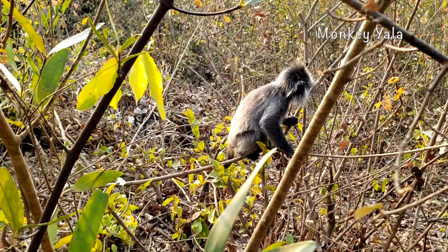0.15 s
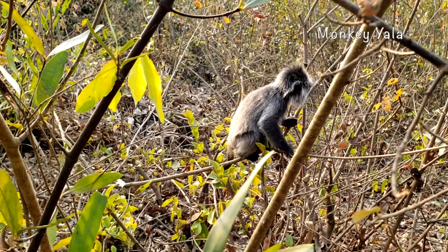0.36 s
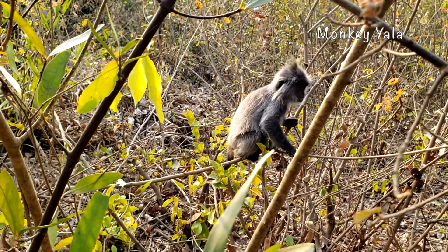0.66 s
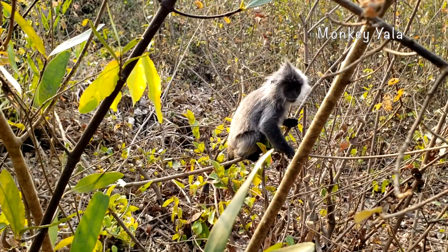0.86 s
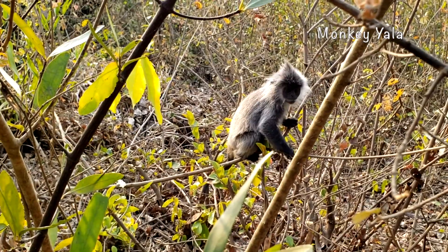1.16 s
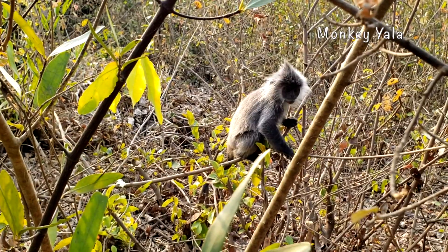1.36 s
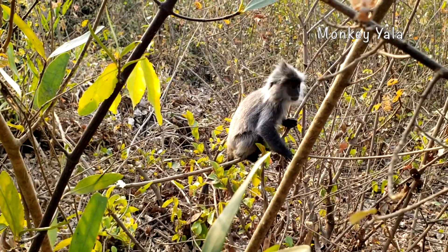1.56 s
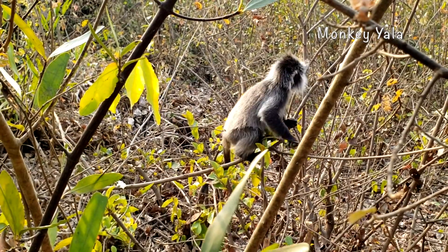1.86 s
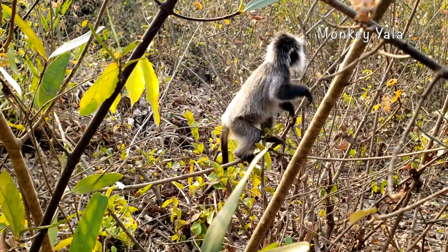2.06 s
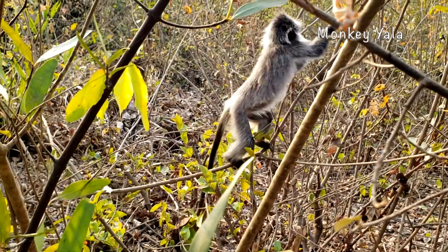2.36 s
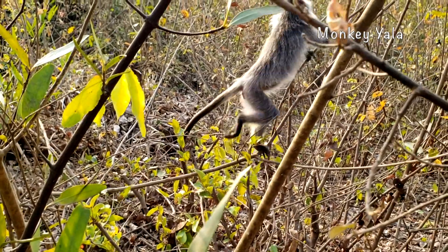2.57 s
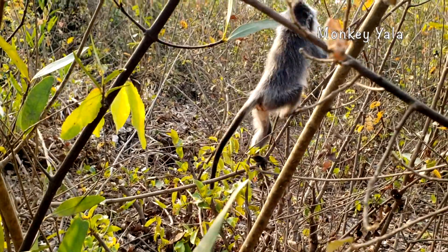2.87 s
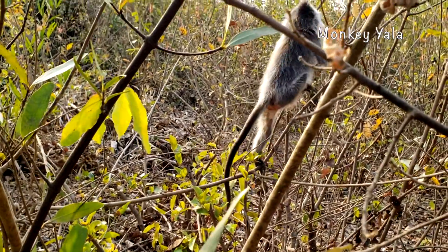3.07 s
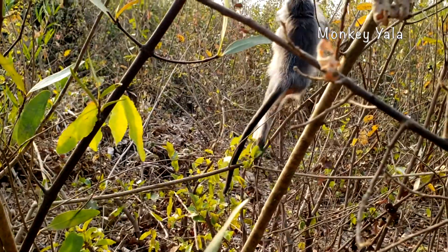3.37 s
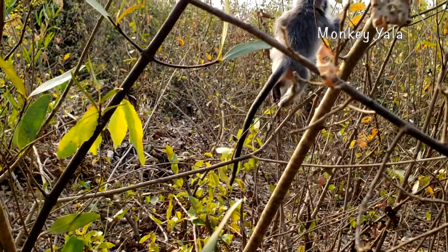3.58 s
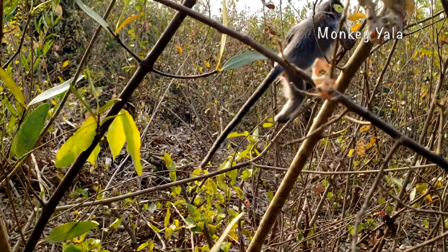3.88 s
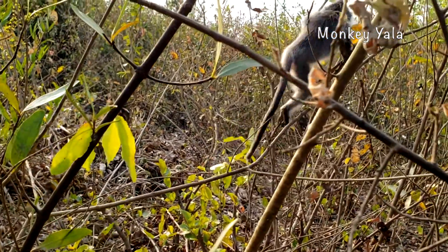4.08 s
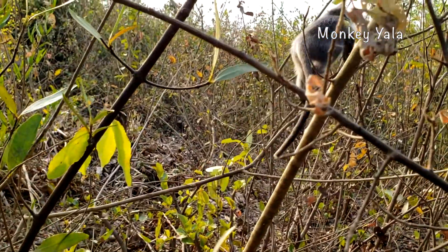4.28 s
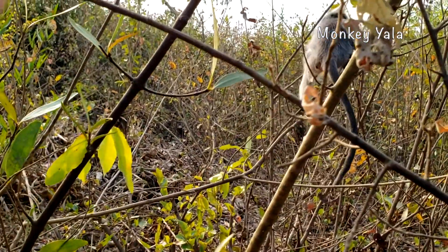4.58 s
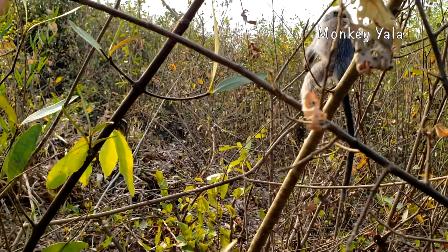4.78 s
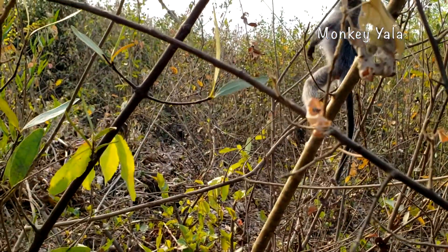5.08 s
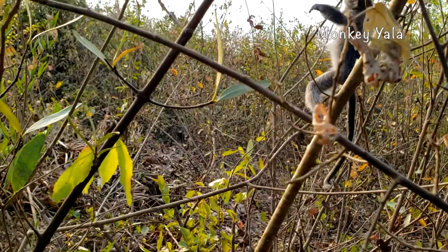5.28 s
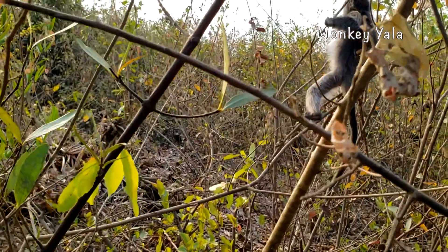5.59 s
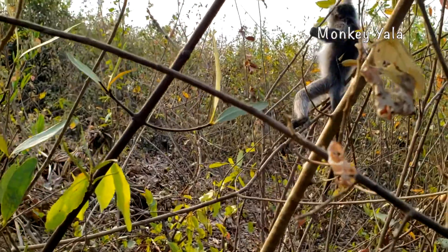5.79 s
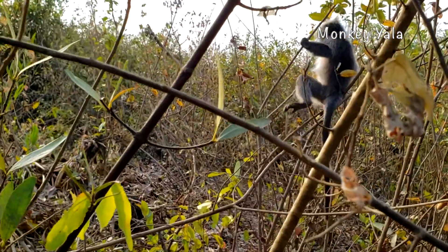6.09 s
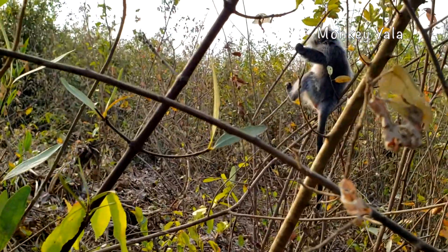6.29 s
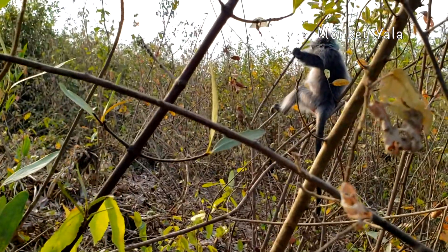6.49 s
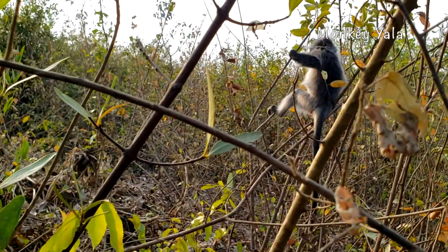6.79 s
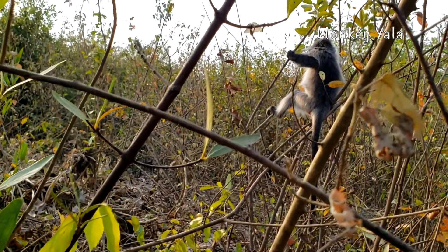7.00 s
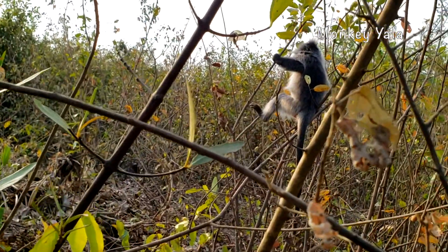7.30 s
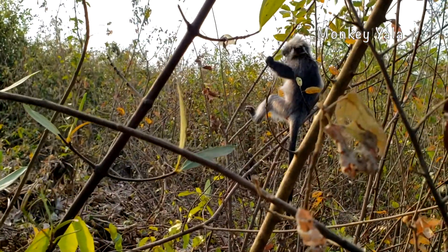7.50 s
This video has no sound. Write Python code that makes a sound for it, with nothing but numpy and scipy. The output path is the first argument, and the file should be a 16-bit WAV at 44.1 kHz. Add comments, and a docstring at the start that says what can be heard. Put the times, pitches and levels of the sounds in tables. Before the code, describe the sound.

Small birds sing quick, high, slurred whistles close by and slightly left in dry scrub for the first 1.3 seconds, with rapid chirps further left and faint caws. A short raspy bird scold comes near 1.9 seconds. From about 2 seconds a monkey climbs through the brush: dead leaves rustle and crackle in uneven pushes and twigs snap, loudest from 3.5 to 4.2 seconds, thinning out by 6. A bird on the left pipes even pips from 2.5 to 4.3 seconds. The close song returns just after 5 seconds with wavy whistles, then from 6.2 repeats a quick rising phrase until the end at about 7.5, with distant birds joining. One more twig snaps near 7.4. A low outdoor rumble and soft hiss lie underneath, and puffs of wind thump the microphone's right side around 3.3 and 5.7 seconds.

```python
"""Small birds sing quick slurred whistles in dry scrub, close by and a little left of the microphone.
They give two bouts of song; others call further off, blurred by scatter from stems and leaves.
Between the bouts a monkey climbs through the brush: dead leaves crackle and twigs snap.
A low outdoor rumble lies underneath, and a few puffs of air buffet the right microphone port."""
import sys
import numpy as np
from scipy import signal
from scipy.fft import rfft, irfft
from scipy.io import wavfile
from scipy.ndimage import uniform_filter1d, map_coordinates

SR = 44100
rng = np.random.default_rng(int(sys.argv[2]) if len(sys.argv) > 2 else 0)


def int16_out(signal):
    """Quantize to a 16-bit WAV file."""
    q = np.round(np.clip(np.atleast_2d(signal).T, -1, 1) * 32767)
    wavfile.write(sys.argv[1], SR, q.astype(np.int16))


N = 337365
T = np.arange(N) / SR
TOP_HZ = 16000  # upper limit of the recorder
STIR_FROM_S = 1.92  # the monkey starts to move


def undb(db):
    """Decibels to gain."""
    return 10 ** (np.asarray(db) / 20)


def unit(x):
    """Scale to rms 1."""
    return x / np.sqrt(np.mean(x ** 2))


def add(track, s, x):
    """Mix x into the track from time s on."""
    i = max(int(s * SR), 0)
    track[..., i:i + x.shape[-1]] += x[..., :max(N - i, 0)]


def colour(x, points):
    """Causal filter of unit energy, shaped by (frequency_hz, gain_db) points."""
    hz, db = np.transpose(points)
    f = np.maximum(np.arange(N + 1) * SR / (2 * N), 1)
    cepstrum = irfft(np.log(undb(np.interp(np.log(f), np.log(hz), db))))
    cepstrum[1:N] *= 2  # fold to minimum phase
    cepstrum[N:] = 0
    response = irfft(np.exp(rfft(cepstrum)))[:SR // 4]
    return signal.fftconvolve(x, response[None] / np.linalg.norm(response))[:, :N]


def band_noise(order, band_hz):
    """Band-passed noise, different at each port."""
    bandpass = signal.butter(order, band_hz, "band", fs=SR, output="sos")
    return signal.sosfilt(bandpass, rng.standard_normal((2, N)))


def walk(rate_hz):
    """A random wander with a spread near 1."""
    knots = rng.standard_normal(int(N / SR * rate_hz) + 2)
    return np.interp(T * rate_hz, np.arange(len(knots)), knots)


def swells(rows, rise_db_per_s, fall_db_per_s):
    """Gain that rises to, holds and falls from each (full_s, held_s, level_db) row."""
    levels_db = [db - rise_db_per_s * np.maximum(s - T, 0) - fall_db_per_s * np.maximum(T - s - held, 0)
                 for s, held, db in rows]
    return undb(np.max(levels_db, axis=0))


def place(x, pan_db, lead_s):
    """A source at the two ports: positive values make it louder and earlier on the left."""
    delayed = map_coordinates(x, [(T - lead_s) * SR], order=3)
    return np.array([undb(pan_db / 2) * x, undb(-pan_db / 2) * delayed])


def scrub(x, t60_s, build_s):
    """Stems and leaves scatter a sound into a short diffuse tail, different at each port."""
    t = T[:SR]
    tail = rng.standard_normal((2, SR)) * undb(-60 * t / t60_s) * (1 - np.exp(-t / build_s))
    tail /= np.linalg.norm(tail, axis=1, keepdims=True)
    return signal.fftconvolve(x[None], tail)[:, :N]


def syrinx(notes, unsteady=0.0099, shimmer_db=0.1, third_db=-27, waver_rad=0.78, edge_db=-15.5):
    """A bird's voice: nearly pure whistles that glide, flutter and never come out quite the same."""
    # note shapes, by name: attack_share, release_share, glide points (length_share, pitch_ratio)
    shapes = { "arch": (0.24, 0.33, [(0, 0.83), (.3, 0.95), (.72, 0.98), (1, 0.76)]),
              "hump": (0.34, 0.24, [(0, .83), (.36, 0.98), (.72, .94), (1, 0.81)]),
              "rise": (0.53, 0.24, [(0, .85), (1, 1.08)]), "lift": (0.54, 0.046, [(0, 0.82), (.68, 0.97),
              (1, .8)]), "climb": (0.67, 0.16, [(0, .68), (.18, .69), (.64, 0.98), (.85, 0.96), (1, 0.76)]),
              "drop": (0.31, 0.62, [(0, 1.3), (.5, 0.92), (1, 0.63)]), "swoop": (0.36, 0.16, [(0, 1.3),
              (.42, 1.025), (1, .96)]), "tew": (0.79, 0.64, [(0, 1.55), (.35, 1.2), (.55, .97), (.76, .8),
              (.86, 1.2), (1, 0.96)]), "wave": (0.13, 0.092, [(0, 0.94), (.14, 1), (.26, 0.96), (.43, .85),
              (.6, .825), (.8, .89), (.93, .85), (1, 0.72)]), "slide": (0.42, 0.11, [(0, 0.88), (.35, 1.11),
              (.55, 1.04), (.94, 0.85), (1, 0.68)]), "burr": (0.26, 0.27, [(0, 0.93), (.56, 1.004),
              (1, 0.67)]), "trill": (0.057, 0.15, [(0, 0.86), (.45, 0.95), (1, .92)]),
              "quiver": (0.17, 0.086, [(0, 1.016), (1, .93)]), "pip": (0.66, 0.14, [(0, .975), (1, 1.023)]),
              "level": (0.053, 0.24, [(0, 1.003), (1, .997)]), "sag": (0.44, 0.11, [(0, 0.97), (.45, 0.93),
              (1, .86)]), "peak": (0.29, 0.22, [(0, 0.47), (.5, 1.05), (1, .62)]),
              "rasp": (0.14, 0.96, [(0, 1.22), (.09, .92), (.2, 1), (.4, .82), (1, 0.62)]), }
    # fast warble within a note, by shape: from_share, to_share, rate_hz, depth_share (of the pitch)
    flutter = { "slide": (0, .45, 68, -.23), "quiver": (0, .95, 55, .04), "trill": (0, 1, 75, .13),
               "burr": (.1, .75, 115, .09), "tew": (0, .4, 150, .15), "rasp": (.1, 1, 170, .15), }
    out, drift, shimmer, stumble = np.zeros(N), walk(350), walk(250), walk(90)
    for s, shape, length, hz, db in notes:
        u = np.linspace(0, 1, int(length * SR))  # share of the note gone by
        now = (int(s * SR) + np.arange(len(u))) % N
        attack, release, glide = shapes[shape]
        contour = np.interp(u, *np.transpose(glide))
        pitch = hz * uniform_filter1d(contour, size=len(u) // 8, mode="nearest")
        if shape in flutter:
            start, end, rate, depth = flutter[shape]
            window = np.sqrt(np.abs(np.sin(np.pi * np.clip((u - start) / (end - start), 0, 1))))
            warble = np.sin(2 * np.pi * rate * length * u + waver_rad * stumble[now])
            pitch *= 1 + depth * window * warble
        phase = 2 * np.pi * np.cumsum(pitch * (1 + unsteady * drift[now])) / SR
        swell = np.minimum(np.minimum(u / attack, (1 - u) / release), 1) ** 0.86
        # only the lower notes, at full voice, carry an audible third harmonic
        third = undb(third_db) * swell ** 2 * np.clip((4800 - pitch) / 500, 0, 1)
        tone = np.sin(phase) + third * np.sin(3 * phase)
        edges = np.minimum(np.minimum(u, 1 - u) * length / .002, 1)
        gain = undb(db + edge_db * (1 - swell) + shimmer_db * shimmer[now])
        add(out, s, np.sqrt(2) * tone * edges * gain)
    return out


def open_air(rumble_db=-62, left_db=-4, right_db=3, rise_db=3.5, hiss_db=-69):
    """Low rumble that slowly grows, heavier at the right port, and the soft hiss of the open scrub."""
    # spectrum of the rumble: frequency_hz, gain_db
    rumble_spectrum = [(22, -16), (45, -1.5), (62, 0.5), (110, -5), (200, -15), (290, -18), (480, -32.5),
                       (1000, -35), (3000, -53.5)]
    # spectrum of the hiss: frequency_hz, gain_db
    hiss_spectrum = [(600, -7), (2000, -7), (3800, -2.5), (5500, -0.5), (8000, -26.5), (11500, -11),
                     (16000, -6)]
    rumble = unit(colour(rng.standard_normal(N) + 0.57 * rng.standard_normal((2, N)), rumble_spectrum))
    drift_db = 2.06 * walk(8.9) + rise_db * (T / T[-1] - 0.22)
    rumble *= undb(rumble_db + drift_db) * undb([[left_db], [right_db]])
    hiss = unit(colour(rng.standard_normal((2, N)), hiss_spectrum))
    return rumble + hiss * undb(hiss_db + walk(2.854))


def buffets(band_hz=(37, 68), left_db=-16):
    """Eddies thump the right port and barely touch the left."""
    # puffs of air on the microphone: start_s, length_s, level_db
    puffs = [(3.245, 0.081, -35.5), (3.315, 0.16, -41.5), (3.544, 0.23, -47.5), (5.714, 0.08, -30),
             (5.761, 0.25, -42)]
    envelope = np.zeros(N)
    eddies = unit(band_noise(3, band_hz))
    for s, length, db in puffs:
        add(envelope, s, undb(db) * np.hanning(int(length * SR)))
    return envelope * eddies * undb([[left_db], [0]])


def flock(count=260, low_hz=2900, high_hz=5700, direct_db=-7, fade_db_per_s=11, rest_db=-84):
    """Many small slurs from beyond the bushes, half blurred into a chorus that swells and fades."""
    # the flock joins each bout of song: full_voice_s, held_s, level_db
    bouts = [(.35, 0.71, -61.5), (6.3, 0.74, -61)]
    kinds = ("drop", "arch", "tew")
    notes = []
    for k, (when, pitch, far) in enumerate(rng.random((count, 3))):
        s = (k + when) / count * N / SR
        notes.append((s, kinds[k % 3], .05, low_hz + pitch * (high_hz - low_hz), -6 * far))
    voices = syrinx(notes)
    blurred = undb(direct_db) * voices + scrub(voices, t60_s=0.22, build_s=0.0021)
    chorus = unit(colour(blurred, [(6300, -5.5), (7400, -19.5)]))
    return chorus * np.maximum(swells(bouts, fade_db_per_s, fade_db_per_s), undb(rest_db))


def hooting_bird():
    """Low hoots from far off on the right, blurred by the distance."""
    # hoots: start_s, shape, length_s, pitch_hz, level_db
    hoots = [(2.72, "hump", 0.083, 1360, -75.5), (5.22, "level", 0.07, 890, -80.5),
             (5.46, "level", 0.21, 1166, -74)]
    voice = syrinx(hoots, shimmer_db=5.0)
    return undb([[-9], [1.5]]) * (voice + scrub(voice, t60_s=0.33, build_s=0.0043))


def hoarse_bird(length_s=0.13, hz=1850, buzz_hz=150, buzz_rad=0.83):
    """A distant caw: an arched tone roughened into sidebands by a fast buzz."""
    # caws: start_s, level_db
    caws = [(-.02, -69), (.255, -69), (0.511, -72.5), (.79, -69), (1.062, -74), (1.33, -74), (1.615, -66)]
    out, t = np.zeros(N), T[:int(length_s * SR)]
    arch = np.sin(np.pi * t / length_s)
    phase = 2 * np.pi * np.cumsum(hz * (1 - 0.17 * (1 - arch))) / SR
    caw = arch * np.sin(phase + buzz_rad * np.sin(2 * np.pi * buzz_hz * t))
    for s, db in caws:
        add(out, s, undb(db) * caw)
    return out + scrub(out, t60_s=0.23, build_s=0.0024)


def far_birds():
    """Birds deeper in the scrub, to the left: much of each note arrives as scatter from the bushes."""
    # runs of one repeated note: first_s, until_s, period_s, shape, length_s, pitch_hz, level_db
    series = [ (0.335, 1.28, .1245, "tew", .07, 3946, -49.5),
              (1.322, 1.85, 0.0665, "drop", 0.034, 2938, -63), (6.112, 7.18, .126, "tew", 0.07, 3740, -53),
              (7.238, 7.48, 0.064, "drop", 0.032, 2887, -62), ]
    # single calls: start_s, shape, length_s, pitch_hz, level_db
    single_calls = [ (.04, "arch", 0.29, 1596, -77), (1.42, "sag", 0.23, 5150, -65.5),
                    (1.72, "drop", 0.054, 5460, -73), (2.21, "peak", 0.03, 5310, -59),
                    (2.305, "drop", 0.07, 5100, -73.5), (2.378, "rise", 0.055, 3500, -72),
                    (2.465, "rise", 0.044, 3620, -67), (3.78, "level", 0.26, 5820, -67),
                    (4.36, "level", 0.41, 3445, -70), (4.74, "pip", 0.25, 3520, -73),
                    (4.91, "level", 0.425, 5500, -71.5), (6.088, "hump", 0.023, 2104, -58.5), ]
    # a scold, two sharp chips and a falling rasp: start_s, shape, length_s, pitch_hz, level_db
    scold = [(1.885, "peak", 0.017, 6650, -57.5), (1.902, "peak", 0.021, 8400, -64),
             (1.918, "rasp", 0.16, 4330, -53.5)]
    notes = [(s, shape, length, hz, db + rng.standard_normal())
             for first, until, period, shape, length, hz, db in series
             for s in np.arange(first, until, period)]
    repeats = syrinx(notes, unsteady=0.016, shimmer_db=5.5, third_db=-54)
    calls = syrinx(single_calls, unsteady=0.011, shimmer_db=4.5)
    calls += syrinx(scold, unsteady=0.046, shimmer_db=3.0, third_db=-45)
    return (place(undb(-6.5) * repeats, pan_db=21.5, lead_s=.00002)
            + undb(0.5) * scrub(repeats, t60_s=0.9, build_s=0.0017)
            + place(undb(-3.5) * calls, pan_db=4.5, lead_s=.00002)
            + undb(-2) * scrub(calls, t60_s=0.29, build_s=0.0023))


def piping_bird(first_s=2.468, until_s=4.3, period_s=.1608, length_s=0.0482,
                hz=3520, flat_hz=400, warm_s=0.27, peak_db=-55, peak_s=3.5, fade_db_per_s=18):
    """On the left, a run of even pips starts flat, climbs to its pitch, swells and dies away."""
    notes = []
    for s in np.arange(first_s, until_s, period_s):
        pitch_hz = hz - flat_hz * np.exp((first_s - s) / warm_s)
        notes.append((s, "pip", length_s, pitch_hz, peak_db - fade_db_per_s * abs(s - peak_s)))
    pips = syrinx(notes, unsteady=0.0059, shimmer_db=2.5)
    return place(pips, pan_db=10.0, lead_s=0) + undb(-14) * scrub(pips, t60_s=0.13, build_s=.003)


def pushing(uneven_db=1.2, stir_db=-72):
    """Force on the leaves: each push builds, holds unevenly and settles, over a slight steady stir."""
    # the monkey's pushes through the brush: full_force_s, held_s, level_db
    pushes = [(2.07, 0.1, -62.5), (2.56, 0.19, -61.5), (2.82, 0.058, -64.5), (3.21, .11, -63),
              (3.459, 0.36, -50), (3.96, 0.24, -58), (4.3, 0.2, -65), (4.68, 0.26, -67), (5.44, 0.43, -60)]
    stirring = undb(stir_db) * np.clip((T - STIR_FROM_S) * 10, 0, 1)
    force = swells(pushes, rise_db_per_s=93, fall_db_per_s=98) * undb(uneven_db * walk(30))
    return np.maximum(force, stirring)


def leaves(grains_per_s=220, grain_s=0.004, hiss_db=-9, crush_db=-52, touch_db=-69, colour_db=3.5):
    """Dead leaves slide with a hiss; a firmer touch adds fractures, which merge as the push grows."""
    # spectrum of the rustle: frequency_hz, gain_db
    leaf_spectrum = [(350, -64), (600, -23.5), (2090, -23.5), (3430, -11), (4710, -1), (7310, -7),
                     (11300, -1), (14900, 0), (16000, -5.5)]
    effort = pushing()
    crowding = 1 + 10 * (effort / undb(crush_db)) ** 2
    fractures = rng.random(N) < grains_per_s * crowding / SR
    energy = signal.lfilter([1], [1, -np.exp(-1 / (grain_s * SR))], fractures / crowding)
    bursts = unit(np.sqrt(energy))
    breaking = effort ** 2 / (effort ** 2 + undb(touch_db) ** 2)  # 0 sliding, 1 fracturing
    texture = (breaking * bursts + 1 - breaking + undb(hiss_db)) * undb(2 * breaking * walk(35))
    # every leaf has its own colour, so each band swells on its own
    edges_hz = np.geomspace(500, TOP_HZ, 9)
    grain = sum(band_noise(2, band) * undb(colour_db * walk(90)) for band in zip(edges_hz, edges_hz[1:]))
    return undb(5.0) * effort * unit(colour(grain * texture, leaf_spectrum))


def crack(hz, decay_s, q=4, broad_db=-7, fibre_s=.0008):
    """Dry fibres give way one after another in a dying burst, strongest around their own resonance."""
    t = T[:SR // 40]
    fibre_times = t[::int(fibre_s * SR)]
    tearing = 1 + np.abs(np.interp(t, fibre_times, rng.standard_normal(len(fibre_times))))
    noise = rng.standard_normal(len(t)) + rng.standard_normal((2, len(t)))
    burst = noise * tearing * np.exp(-t / decay_s)
    ring = signal.lfilter(*signal.iirpeak(min(hz, TOP_HZ), q, fs=SR), burst)
    sound = ring / np.std(ring) + undb(broad_db) * burst / np.std(burst)
    return sound / np.abs(sound).max()


def crackle(count=260, until_s=6.0, low_hz=4500, high_hz=15500, over_db=8.5, spread_db=3.5):
    """Single brittle leaves crack at random, as hard as the monkey pushes, each at its own pitch."""
    out, effort = np.zeros((2, N)), pushing()
    for when, pitch, chance in rng.random((count, 3)):
        s = STIR_FROM_S + when * (until_s - STIR_FROM_S)
        size = effort[int(s * SR) % N] * undb(over_db + spread_db * min(-np.log(1 - chance), 3))
        hz = low_hz + np.sqrt(pitch) * (high_hz - low_hz)
        add(out, s, size * crack(hz, decay_s=0.0014))
    return out


def twigs(bend_s=0.008, bend_db=-29, shake_s=0.016, shake_db=-23):
    """A twig creaks as it bends, breaks with a crack of its own pitch and shakes the leaves nearby."""
    # snapping twigs: break_s, level_db, resonance_hz
    snaps = [ (2.6023, -42, 11200), (2.717, -35, 15100), (3.2037, -42, 14900), (3.315, -38.5, 6130),
             (3.481, -27.5, 14800), (3.7079, -28.5, 13900), (3.7327, -25, 14600), (3.7463, -21, 10400),
             (3.7517, -20, 11600), (3.7821, -32, 13900), (3.817, -30.5, 7100), (3.919, -36, 15000),
             (3.9362, -36.5, 4200), (3.967, -27, 11000), (4.028, -33.5, 13700), (4.1682, -30, 9200),
             (4.173, -34.5, 5200), (4.445, -38, 11500), (4.6395, -31.5, 12300), (4.694, -41.5, 11600),
             (4.813, -33.5, 13400), (5.0945, -40.5, 12500), (5.374, -37, 12200), (5.4235, -33.5, 14500),
             (7.392, -38.5, 6360), ]
    # tone colour of the dry wood: frequency_hz, gain_db
    twig_spectrum = [(500, -24.5), (2040, -21.5), (3540, -5.5), (8000, -6)]
    out = np.zeros((2, N))
    t = T[:SR // 6] - T[SR // 30]  # zero at the break
    bend = undb(bend_db) * np.exp(-np.abs(t) / bend_s)
    shake = undb(shake_db) * np.exp(-np.abs(t) / shake_s)
    around = np.where(t < 0, bend, shake)
    for s, db, hz in snaps:
        add(out, s, undb(db + 1.5) * crack(hz, decay_s=0.004))
        add(out, s + t[0], undb(db) * around * rng.standard_normal((2, len(t))))
    return colour(out, twig_spectrum)


def song_notes(climb_s=.075, triplet_rise=0.041, triplet_fade_db=1.05,
               low_s=.06, low_hz=3624, wave_after_s=0.12, wave_s=.108, wave_hz=5018):
    """Loose notes and triplets open; couplets lead to the main phrase, whose steps sag as it repeats."""
    # loose notes: start_s, shape, length_s, pitch_hz, level_db
    loose_notes = [ (.048, "slide", 0.087, 5030, -38.5), (.2, "climb", 0.079, 4036, -38.5),
                   (.293, "rise", 0.025, 2670, -50), (.409, "trill", 0.053, 6490, -49.5),
                   (.445, "quiver", 0.085, 6280, -45.5), (.467, "arch", 0.037, 5000, -46),
                   (.52, "arch", 0.036, 4860, -46), (.908, "pip", 0.029, 5900, -42.5),
                   (.928, "trill", 0.042, 6280, -42.5), (6.035, "quiver", 0.092, 6470, -50),
                   (6.085, "arch", 0.059, 5326, -40.5), ]
    # a climbing note and two arches, each a little higher: start_s, arch_length_s, pitch_hz, level_db
    triplets = [(0.651, .053, 4127, -38), (1.036, .055, 4060, -42)]
    # a low note, a burr when sung harder, then a wavy whistle: start_s, low_shape, low_db, wave_db
    couplets = [(5.122, "arch", -57, -47), (5.439, "burr", -44, -40.5), (5.739, "burr", -43, -39.5)]
    # main phrase, three steps up and a high flourish:
    # delay_s, shape, length_s, pitch_hz, sag_hz_per_repeat, level_db
    phrase = [ (0, "hump", 0.04, 3458, 85, -45), (0.041, "hump", 0.042, 3920, 33.5, -39),
              (0.082, "hump", .06, 4310, 31, -37.5), (0.214, "lift", 0.037, 6350, -2, -42.5),
              (.25, "trill", .043, 6500, 0, -53.5), (0.291, "swoop", .049, 5046, -2.5, -39), ]
    # when the phrase is sung: start_s
    phrase_starts = [6.218, 6.645, 7.077, 7.514]
    notes = list(loose_notes)
    for s, length, hz, db in triplets:
        notes.append((s, "climb", climb_s, hz, db))
        for k in (1, 2):
            start = s + climb_s + (k - 1) * length
            notes.append((start, "arch", length, hz * (1 + k * triplet_rise), db - k * triplet_fade_db))
    for s, shape, low_db, wave_db in couplets:
        notes.append((s, shape, low_s, low_hz, low_db))
        notes.append((s + wave_after_s, "wave", wave_s, wave_hz, wave_db))
    for k, s in enumerate(phrase_starts):
        for delay, shape, length, hz, sag, db in phrase:
            notes.append((s + delay, shape, length, hz - k * sag, db))
    return notes


def near_birds():
    """The singers sit close by, a little to the left, nearly dry; the bushes answer a moment later."""
    song = syrinx(song_notes(), unsteady=.008, shimmer_db=.9)
    echo = scrub(song, t60_s=.38, build_s=.014)
    return place(song, pan_db=2.5, lead_s=.00003) + undb(-11) * echo


def scene():
    """Birds near and far, the climb through the brush and the open air, at the two microphone ports."""
    birds = near_birds() + far_birds() + piping_bird() + hoarse_bird() + hooting_bird() + flock()
    monkey = leaves() + crackle() + twigs()
    return birds + monkey + open_air() + buffets()


def record(dry):
    """The recorder cuts the top treble steeply."""
    return signal.sosfilt(signal.ellip(10, .2, 70, TOP_HZ, fs=SR, output="sos"), dry)


dry = scene()
out = record(dry)
int16_out(out)
```